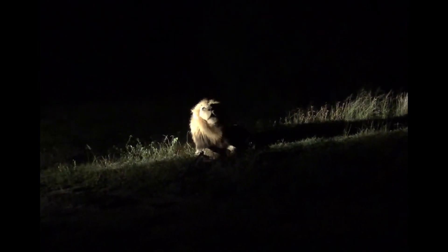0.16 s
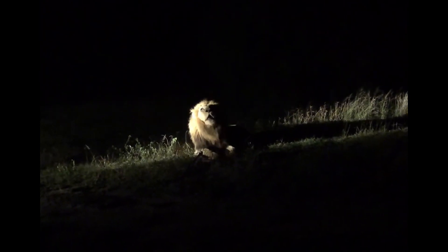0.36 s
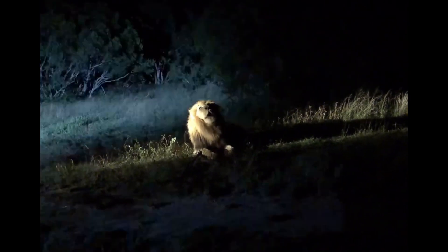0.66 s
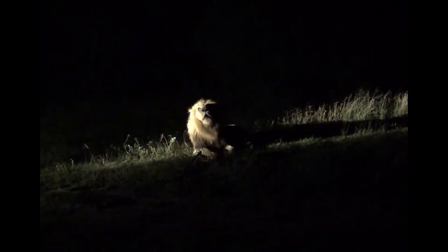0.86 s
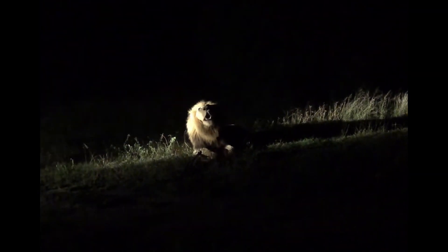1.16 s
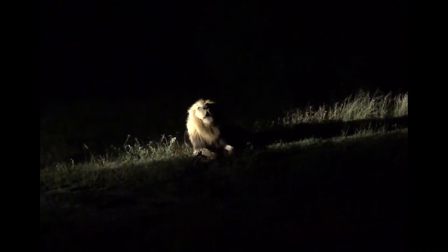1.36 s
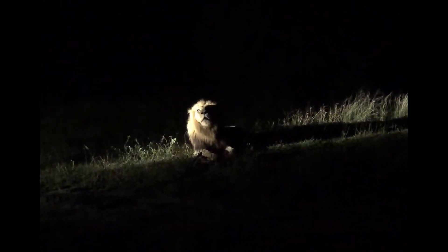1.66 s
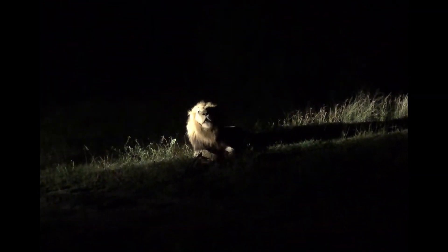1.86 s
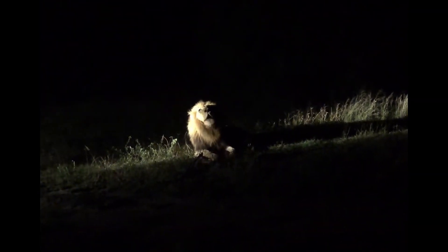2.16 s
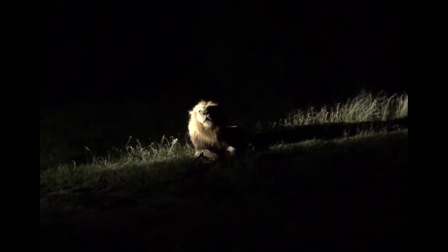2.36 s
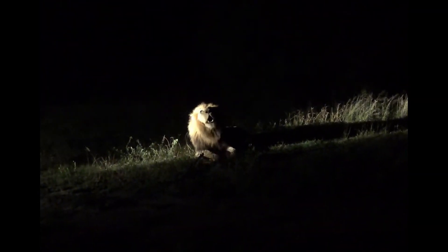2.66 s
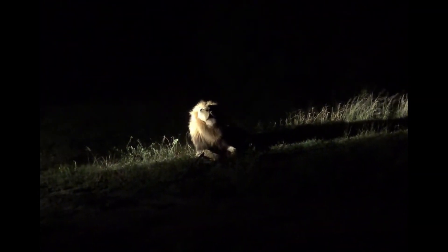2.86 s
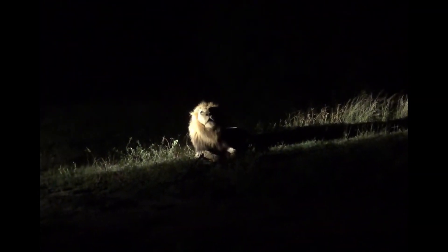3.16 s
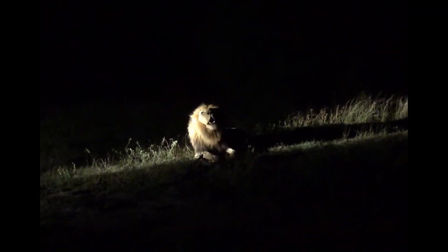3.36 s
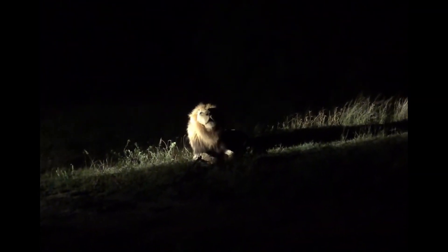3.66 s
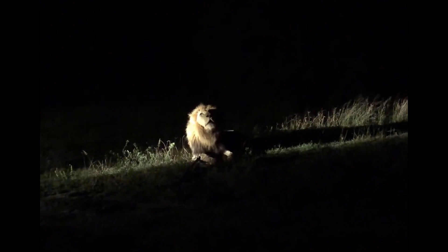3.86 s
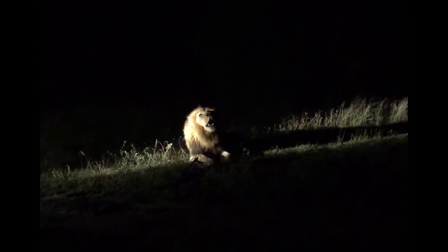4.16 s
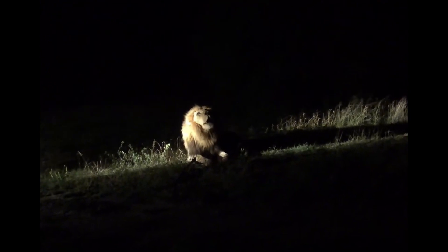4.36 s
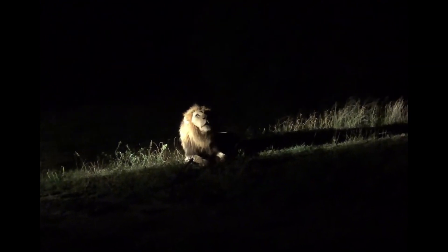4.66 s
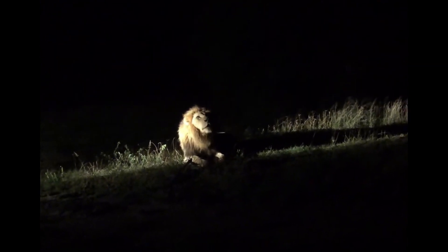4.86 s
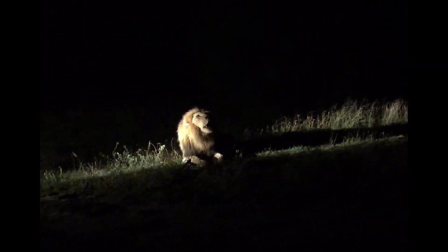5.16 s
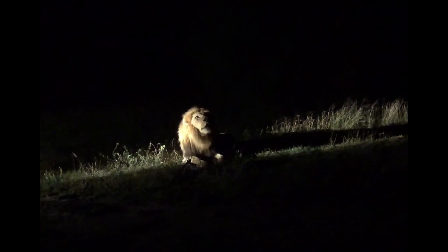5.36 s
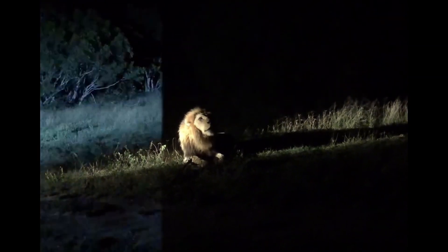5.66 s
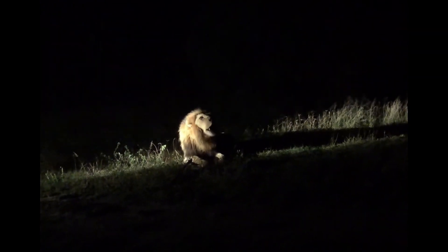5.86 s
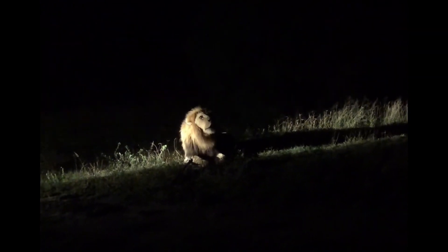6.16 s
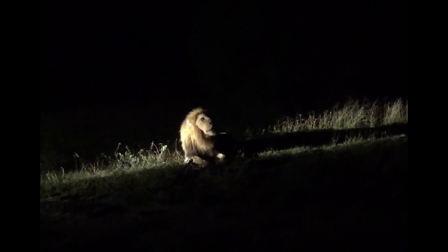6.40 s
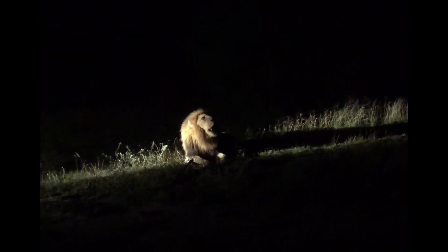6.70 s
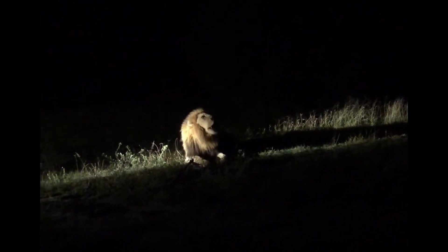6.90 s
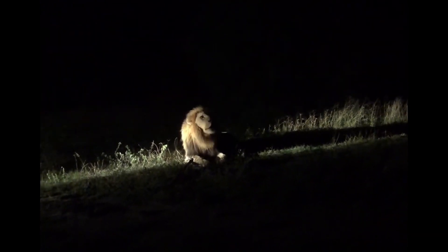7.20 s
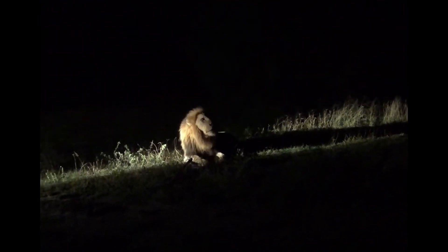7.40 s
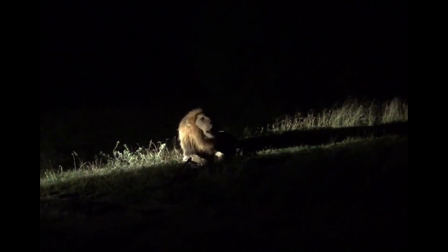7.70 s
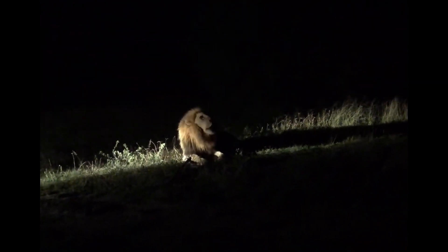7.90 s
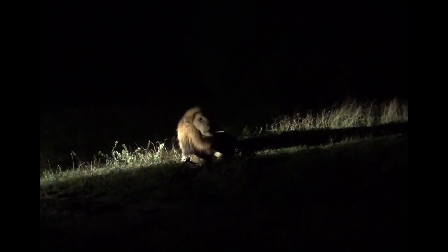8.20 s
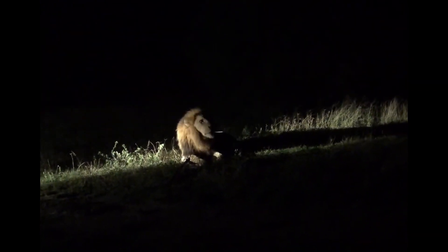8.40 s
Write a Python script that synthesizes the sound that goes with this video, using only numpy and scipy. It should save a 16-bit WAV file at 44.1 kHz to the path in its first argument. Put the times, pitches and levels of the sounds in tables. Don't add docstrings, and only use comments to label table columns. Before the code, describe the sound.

In open grassland at night, a lion sends out six low roars about one to two seconds apart. The first is long and resonant, breaking into a rasp; later ones grow short, sinking and rough, the last fading to a murmur. Single chesty grunts fall after several calls. The sound is close and strong, peaks held back, with a short dull outdoor tail, soft wind rumbles on the microphone and a faint steady night hush.

```python
import sys
import numpy as np
from scipy import signal
from scipy.fft import rfft, irfft
from scipy.io import wavfile
from scipy.ndimage import uniform_filter1d, minimum_filter1d

SR = 44100
rng = np.random.default_rng(int(sys.argv[2]) if len(sys.argv) > 2 else 0)


def pcm_store(signal):
    levels = np.round(np.clip(np.atleast_2d(signal), -1, 1) * 32767)
    wavfile.write(sys.argv[1], SR, levels.astype(np.int16).T)


def field_ratio(decibels):
    return 10 ** (np.asarray(decibels, dtype=float) / 20)


N = 376613
T = np.arange(N) / SR
FOLD_PACE = 0.96

# [start_s, pitch_hz, fundamental_db]
EARLY_MOANS = [
    [(0.38, 125.8, -22), (0.416, 123.7, -19.5), (0.456, 141.4, -9), (0.644, 154.2, -5),
     (1.146, 144.1, -7.5), (1.272, 137.4, -12), (1.358, 101, -24), (1.392, 101.7, -29), (1.5, 154.3, -31)],
    [(2.31, 130.8, -21), (2.406, 142.5, -7.5), (2.494, 142.6, -6), (2.688, 142.5, -13.5),
     (2.842, 133.9, -9.5), (2.952, 132.5, -17), (3.0, 157.5, -15), (3.026, 162.2, -18), (3.06, 163, -37)],
    [(3.88, 141.5, -20), (3.974, 140.4, -5), (4.052, 141.3, -12.5), (4.12, 135.8, -9.5),
     (4.162, 135.2, -8.5), (4.218, 124, -2), (4.28, 127, -11.5), (4.36, 128.1, -18), (4.47, 128.3, -36)],
]
# [start_s, pitch_hz, fundamental_db]
LATE_MOANS = [
    [(5.25, 138.7, -19), (5.308, 138.4, -9.5), (5.418, 139.4, -7), (5.458, 133, -9.5), (5.512, 132.1, -11),
     (5.554, 120, -16.5), (5.638, 120, -21.5), (5.68, 116.9, -28.5)],
    [(6.45, 134.8, -24), (6.538, 137.2, -7), (6.72, 128.2, -9), (6.814, 112.6, -16.5), (6.868, 111.1, -10),
     (6.92, 101.8, -18.5), (7.01, 98.35, -35), (7.11, 117.8, -37.5)],
    [(7.58, 146, -28), (7.632, 139.2, -12.5), (7.722, 139, -8), (7.852, 125.8, -11.5), (7.932, 115, -27.5),
     (8.018, 112.5, -43.5), (8.064, 132.3, -46), (8.09, 136.9, -40.5)],
]
# [glottis_opens_s, breath_ends_s, air_db, release_db_per_s, overtones_re_tone_db]
BREATHS = [
    (0.367, 1.327, -30, 152, -12),
    (2.326, 3.021, -30.5, 357, -12),
    (3.864, 4.381, -30.5, 188, -10.5),
    (5.229, 5.62, -29.5, 169, -8.5),
    (6.448, 6.94, -30.5, 177, -9),
    (7.587, 7.868, -27.5, 186, -8),
]
# [glottis_opens_s, first_pitch_hz, tone_db, growl_db, air_db]
GRUNTS = [
    (1.897, 145.8, -18, -9.5, -26.5),
    (3.329, 112, -17.5, -14, -27),
    (4.99, 145.8, -18, -12, -29),
    (5.775, 110, -17.5, -12.5, -27),
]
# [center_s, half_length_s, pitch_hz, tone_db, air_db]
MURMURS = [(.001, 0.036, 116.8, -24.5, -40), (0.216, 0.57, 163, -47.5, -52.5),
           (1.579, 0.059, 150, -37.5, -72), (1.82, .09, 136.6, -47.5, -54), (2.23, 0.092, 143, -34, -47.5),
           (3.191, 0.038, 135, -23, -54.5), (3.285, .03, 140.1, -18, -50), (3.731, .06, 97, -33, -47),
           (3.83, 0.067, 140.3, -26, -52), (4.842, 0.0757, 150.2, -32, -59),
           (4.933, .05, 149.3, -29.5, -52.5), (6.338, .06, 167.5, -43, -52), (7.06, .05, 108.4, -40, -51.5),
           (7.501, .15, 147.9, -51.5, -56.5), (8.5, .12, 128.4, -60.5, -63)]


def rms_one(x):
    return x / np.sqrt(np.mean(x ** 2) + 1e-20)


def evened(x, span_s):
    return x / np.sqrt(uniform_filter1d(x ** 2, size=int(span_s * SR)) + 1e-9)


def drift(rate_hz):
    r = np.exp(-2 * np.pi * rate_hz / SR)
    noise = rng.standard_normal(N + 20000)
    return rms_one(signal.lfilter([1], [1, -2 * r, r * r], noise)[20000:])


def band(x, low_hz, high_hz):
    return signal.sosfilt(signal.butter(3, [low_hz, high_hz], "band", fs=SR, output="sos"), x)


def course(s, values, outside):
    return np.interp(T, s, values, left=outside, right=outside)


def bump(center_s, half_s):
    return ((T - center_s) / half_s) ** 2


def cavity(x, resonances, patchy_db):
    out = 0
    for hz, width_hz, db in resonances:
        carrier = np.exp(2j * np.pi * hz * T)
        r = np.exp(-1.5 * np.pi * width_hz / SR)
        near = signal.lfilter([(1 - r) ** 2], [1, -2 * r, r * r], x * np.conj(carrier))
        out = out + field_ratio(db + patchy_db * drift(11.8)) * np.real(near * carrier)
    return out


def fold_tone(cycles, rough, tone_db, over_db, grip):
    # [multiple, level_db]
    partials = [(1.5, -12), (2, -7), (2.5, -3.5), (3, 4), (3.5, -7), (4, -3), (4.5, -6), (5, -2.5),
                (5.5, -10.5), (6, -10.5), (7, -23), (8, -11.5), (9, -26.5), (10, -42), (12, -20)]
    octave_grows_db_per_s, half_steps_fade_db_per_s = 1.5, 1.3
    scatter = (drift(32) + 1j * drift(35)) / np.sqrt(2)
    fold = np.sqrt(1 - rough ** 2) + rough * scatter
    tone = np.real(fold * np.exp(2j * np.pi * cycles))
    overs = 0
    for multiple, db in partials:
        trend_db = (multiple == 2) * octave_grows_db_per_s - (multiple % 1 > 0) * half_steps_fade_db_per_s
        waver = field_ratio(db + trend_db * T + 3.7 * drift(11.0))
        turns = multiple * FOLD_PACE * cycles + rng.random() + 0.073 * drift(30)
        overs = overs + waver * np.sin(2 * np.pi * turns)
    overs = field_ratio(over_db - 8.0) * (1 - rough ** 2) * overs
    return np.sqrt(2) * grip * (field_ratio(tone_db + 1.86) * tone + overs)


def growl(cycles, rough, growl_db, air_db):
    # [center_hz, width_hz, level_db]
    throat = [(199.8, 24, -2), (279.4, 43, -11.5), (333.5, 67, 4.5), (443, 36.7, 3), (506.5, 68, -8)]
    # [center_hz, width_hz, level_db]
    pharynx = [(710, 62, -3.5), (795.5, 62, -5), (917, 74, -12), (1029, 87, -13), (1180, 51, -14),
               (1290, 69, -15.5)]
    beats = FOLD_PACE * cycles + rough ** 2 * 1.2 * drift(30) + 0.034 * drift(55)
    at = np.flatnonzero(np.diff(np.maximum.accumulate(np.floor(beats)), prepend=0))
    alternation = 1 + 0.67 * (-1) ** np.arange(len(at))
    flaps = np.zeros(N)
    flaps[at] = alternation * field_ratio((-1.0 + 4.5 * rough) * drift(120))[at]
    source = rms_one(flaps) + (0.22 + 0.5 * rough) * rng.standard_normal(N)
    source = source + snaps(16.6, growl_db - 10.5)

    opening_db = -5.5 - 0.59 * np.maximum(growl_db - air_db - 10.5, 0)
    middle = field_ratio(closing_db(air_db)) * cavity(source, pharynx[:2], patchy_db=4.5)
    upper = field_ratio(opening_db + 8.0) * (middle + cavity(source, pharynx[2:], patchy_db=5.5))
    body = cavity(source, throat, patchy_db=3.5) + upper
    return field_ratio(growl_db - 5.0 - 6.9 * (0.5 - rough)) * evened(body, 0.12), flaps


def closing_db(air_db):
    closing_s, closed_db = 0.086, -21
    slow = uniform_filter1d(air_db, size=4000)
    return np.clip(closing_s * SR * np.gradient(slow), closed_db, 0)


def snaps(gain_db, against_db):
    # [start_s, peak_db]
    closures = [(0.372, -28.5), (1.172, -16), (1.898, -26), (1.919, -7), (1.964, -12), (2.319, -13.5),
                (2.633, -24), (3.332, 8), (3.867, -9.5), (3.885, -15), (4.252, -41), (4.989, -23),
                (5.015, -11), (5.228, -57), (5.576, -10.5), (5.772, -30), (5.795, -25), (6.44, -17),
                (6.84, 9), (7.588, -43)]
    clicks, at = np.zeros(N), [round(s * SR) for s, db in closures]
    clicks[at] = field_ratio(np.clip(np.array(closures)[:, 1] + gain_db - against_db[at], -20, 12))
    decay = np.exp(-1 / (0.0042 * SR))
    return signal.lfilter([1], [1, -decay], clicks + 1e-18) * rng.standard_normal(N)


def rush(cycles, flaps, air_db):
    # [center_hz, width_hz, level_db]
    jaws = [(1750, 510, -2.5), (2332, 770, 1.5), (2722, 454, 4.5), (3112, 240, 4), (3560, 400, 1),
            (4095, 720, -2.5), (4610, 870, -4.5), (5394, 1580, -7.5), (7030, 2460, -10.5),
            (9700, 1800, -23.5), (11800, 4200, -20.5)]
    puffs = rms_one(signal.lfilter([1], [1, -0.99], flaps))
    gate = 1 + 0.2 * np.sin(2 * np.pi * cycles) + 0.2 * puffs
    source = gate * rng.standard_normal(N) + snaps(-6.0, air_db)
    return field_ratio(air_db - 5.0) * evened(cavity(source, jaws, patchy_db=3.0), 0.13)


def moans():
    rise_db_per_s, tail_db_per_s = 595.5, 108
    overtones_fade_db = 22
    onset_db, attack_s, sag_db, growl_over_air_db = -7, 0.12, -3, 12.5
    growl_lingers = 0.079
    layers = []
    for rows, (start, end, db, release, over_db) in zip(EARLY_MOANS + LATE_MOANS, BREATHS):
        s, hz, tone = np.transpose(rows)
        tone_db = course([s[0] - 0.1, *s, s[-1] + 1],
                         [tone[0] - 0.1 * rise_db_per_s, *tone, tone[-1] - tail_db_per_s], -150)
        fade_db = overtones_fade_db * np.clip((T - start) / (end - start), 0, 2) ** 2
        air_db = db + course([start - 0.008, start, start + attack_s, end, end + 0.5],
                             [-25, onset_db, 0, sag_db, sag_db - 0.5 * release], -150)
        linger_db = course([end, end + 0.5], [0, 0.5 * growl_lingers * release], 0)
        growl_db = air_db + growl_over_air_db + linger_db
        layers.append([tone_db, tone_db + over_db - fade_db, growl_db, air_db])
    return np.max(layers, axis=0)


def grunts():
    # [after_opening_s, tone_db, growl_db, air_db]
    gesture = [(-.04, -36.5, -40, -24), (0, -7.5, -13.5, -18.5), (.035, -8.5, -0.5, -6.5),
               (0.078, 0.2, -2, -0.5), (0.144, -5.5, -16, -11), (.23, -11, -26.5, -17),
               (.32, -29, -48.5, -36), (.6, -64, -70, -74)]
    s, tone, throat, air = np.transpose(gesture)
    layers = []
    for at, hz, tone_db, throat_db, air_db in GRUNTS:
        parts = [(tone_db, tone), (tone_db - 14, 0.5 * (tone + throat)), (throat_db, throat), (air_db, air)]
        layers.append([course(at + s, db + shape, -150) for db, shape in parts])
    return np.max(layers, axis=0)


def murmurs():
    layers = []
    for s, half, hz, tone, air in MURMURS:
        peaks_db = np.array([[tone], [tone - 19], [0.5 * (tone + air) + 1.5], [air]])
        layers.append(peaks_db - 7 * bump(s, half))
    return np.max(layers, axis=0)


def rasps():
    # [center_s, half_length_s, growl_gain_db, air_gain_db]
    tight = [(0.375, .02, 2, -7.5), (.47, 0.035, 10, 4.5), (1.005, 0.21, 5, 0), (1.239, 0.11, 9, 6),
             (2.35, 0.023, 7.5, 2), (2.653, 0.092, 11, 3), (2.922, 0.063, 4, 3), (3.365, .03, 9.5, 6),
             (3.895, 0.036, 7, 0), (4.036, 0.054, 3, 4), (4.189, 0.048, 13, 5.5), (4.265, 0.026, 12, 9),
             (5.27, 0.011, 13.5, 4), (5.583, 0.0079, 3, 8.5), (5.608, .025, 2, -4), (5.678, 0.064, -3, 3),
             (5.829, 0.024, 4.5, -5.5), (6.473, 0.038, 7.5, 2.5), (6.63, 0.039, 0, 3.5),
             (6.741, 0.041, 10.5, 0), (6.861, 0.023, 5, 12.5), (6.93, 0.041, 4, -0.5),
             (7.71, 0.048, 2.5, 0.5)]
    growl_db, air_db = sum(np.outer([growl_gain, air_gain], np.exp(-bump(s, half)))
                           for s, half, growl_gain, air_gain in tight)
    return np.array([0 * air_db, 0.75 * growl_db, growl_db, air_db])


def pitch():
    peak_hz, end_hz = 110, 95.92
    points = [(s, hz) for rows in EARLY_MOANS + LATE_MOANS for s, hz, db in rows]
    points += [(row[0], row[2]) for row in MURMURS]
    for at, hz, *levels in GRUNTS:
        points += [(at + 0.03, hz), (at + 0.08, peak_hz), (at + 0.15, end_hz), (at + 0.22, 0.93 * end_hz)]
    s, hz = np.transpose(sorted(points))
    return np.interp(T, s, hz)


def roughness():
    # [clear_from_s, clear_until_s, hoarse_from_s, tone_lost_s]
    fold_states = [
        (.51, 1.14, 1.18, 1.33),
        (2.38, 2.62, 2.82, 2.94),
        (3.96, 4.15, 4.24, 4.46),
        (5.29, 5.45, 5.56, 5.62),
        (6.52, 6.7, 6.8, 6.98),
        (7.65, 7.8, 7.9, 7.94),
    ]
    # [after_opening_s, roughness_0_to_1]
    grunt_states = [(-.02, .9), (.03, .5), (.09, .32), (.2, .45), (.28, .9)]
    # [start_s, end_s]
    voiced = [
        (4.77, 4.96),
        (8.08, 8.25),
    ]
    clear, hoarse, loose, settle_s = 0.06, 0.35, 0.9, 0.07
    s, values = np.transpose(grunt_states)
    shapes = [course(row[0] + s, values, loose) for row in GRUNTS]
    for a, b in voiced:
        shapes.append(course([a - settle_s, a, b, b + settle_s], [loose, hoarse, hoarse, loose], loose))
    for start, until, rough_from, lost in fold_states:
        times = [start - 2 * settle_s, start, until, rough_from, lost - settle_s / 2, lost + settle_s / 2]
        shapes.append(course(times, [loose, clear, clear, hoarse, hoarse, loose], loose))
    return np.min(shapes, axis=0)


def slips():
    # [center_s, depth_db, length_s]
    lost_grips = [(0.516, -13, 0.0043), (0.671, -10.5, 0.0054), (1.159, -29, 0.004), (1.297, -4, 0.004),
                  (2.897, -4.5, 0.004), (4.238, -30, 0.0033), (5.588, 3, 0.0034), (6.607, -11, 0.0076),
                  (6.724, -7, 0.017), (6.78, 0.5, 0.038)]
    dip_db, turns = np.zeros(N), np.zeros(N)
    for s, depth_db, length_s in lost_grips:
        dip_db += depth_db * np.exp(-bump(s, length_s))
        turns += 0.1452 * np.tanh((T - s) / length_s)
    return field_ratio(dip_db), turns


def held_breath():
    db = np.zeros(N)
    for s, *rest in BREATHS + GRUNTS:
        db -= 9.0 * np.exp(np.minimum(T - s, 0) / 0.03) * (T < s)
    return field_ratio(db)


def field(x):
    t60_s, level_db = 0.25, -6
    t = np.arange(int(0.6 * SR)) / SR
    tail = rng.standard_normal(len(t)) * field_ratio(-60 * t / t60_s) * (t > 0.002)
    return x + field_ratio(level_db) * signal.fftconvolve(x, tail / np.sqrt(np.sum(tail ** 2)))[:N]


def echoes(x):
    # [delay_s, level_db]
    paths = [(.043, -26), (.071, -20.5), (.113, -26), (.167, -34), (0.234, -48)]
    out = np.zeros(N)
    for s, db in paths:
        lag = round(s * SR)
        out[lag:] += field_ratio(db) * x[:-lag]
    return band(out, 67, 2800)


def ground(x):
    # [center_hz, width_hz]
    dips = [(605, 65), (3850, 90)]
    for hz, width_hz in dips:
        x = 0.25 * x + 0.75 * signal.lfilter(*signal.iirnotch(hz, hz / width_hz, fs=SR), x)
    return x


def wind():
    # [peak_s, level_db, slope_db_per_s]
    gusts = [(.001, -37, 82), (.58, -32, 109), (1.09, -27, 67), (2.1, -40, 21.5), (2.68, -13.5, 152),
             (2.92, -17.5, 85), (3.2, -27.5, 150), (3.65, -31.5, 36), (3.97, -16.5, 110), (4.6, -40.5, 11),
             (5.07, -66, 120), (5.97, -35.5, 99), (7.0, -58, 30), (7.66, -46, 70)]
    db = np.max([db - slope * abs(T - s) for s, db, slope in gusts], axis=0)
    return field_ratio(db) * rms_one(band(rng.standard_normal(N), 67, 140))


def night():
    # [frequency_hz, density_db_per_hz]
    spectrum = [(24, -36), (40, -69), (143, -2.5), (235, -21), (368, -16), (591, -25), (2010, -29.5),
                (2450, -30), (15500, -47)]
    hz, db = np.transpose(spectrum)
    bins_hz = np.arange(N // 2 + 1) * SR / N
    shape = field_ratio(np.interp(np.log(bins_hz + 1), np.log(hz), db))
    noise = rms_one(irfft(rfft(rng.standard_normal(N)) * shape, N))
    return field_ratio(-53.5 - 5.5 + 0.72 * drift(3)) * noise


def scene():
    levels_db = np.maximum(np.max([moans(), grunts(), murmurs()], axis=0), -100)
    tone_db, over_db, growl_db, air_db = levels_db + rasps()
    rough = roughness()
    grip, turns = slips()
    cycles = np.cumsum(pitch() * (1 + 0.005 * drift(30)) / SR) + turns
    throat, flaps = growl(cycles, rough, growl_db, air_db)
    held = held_breath()
    rasp = held * field(throat + rush(cycles, flaps, air_db))
    tone = fold_tone(cycles, rough, tone_db, over_db, grip * held)
    return (ground(tone + echoes(tone) + rasp) + wind() + night())[None]


def roll_off(x):
    return signal.sosfilt(signal.butter(12, 15710, fs=SR, output="sos"), x)


def record(dry):
    heard = signal.sosfilt(signal.butter(3, 48, "high", fs=SR, output="sos"), dry)
    heard = signal.sosfilt(signal.cheby2(14, 60, 15900, fs=SR, output="sos"), heard)
    room = np.minimum(1, 0.99 / (np.abs(heard) + 1e-9))
    gain = uniform_filter1d(minimum_filter1d(room, size=400), size=400)
    return roll_off(heard * gain)


dry = scene()
out = record(dry)
pcm_store(out)
```